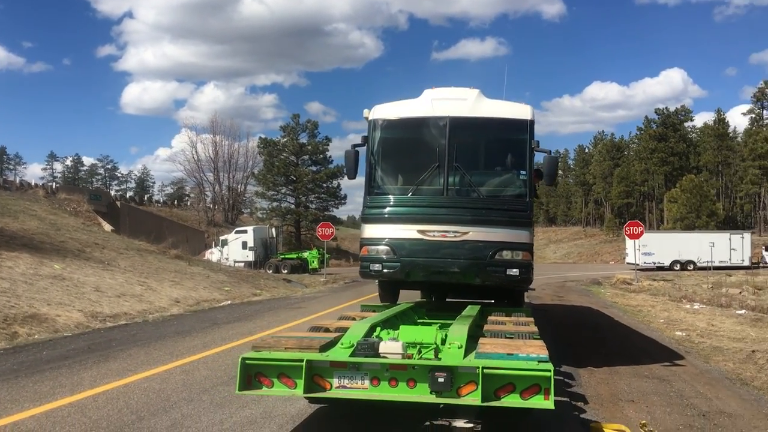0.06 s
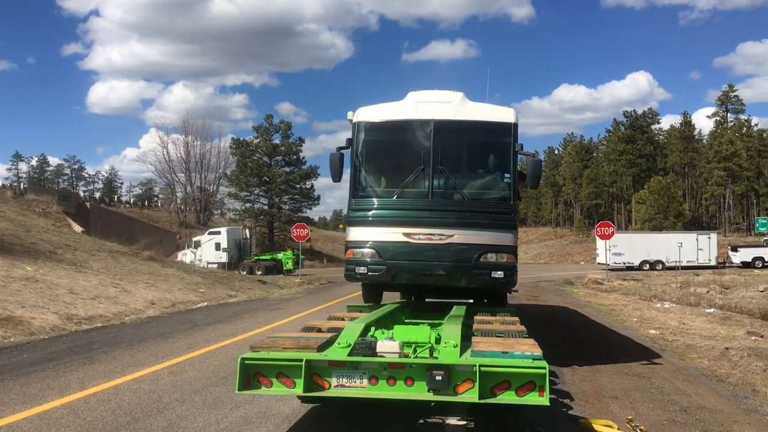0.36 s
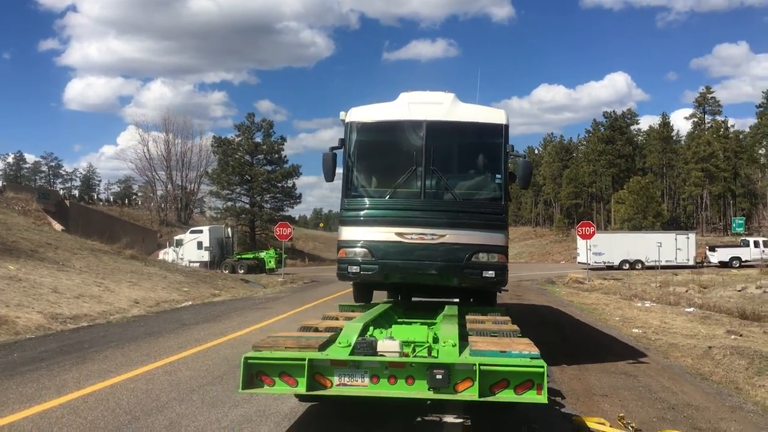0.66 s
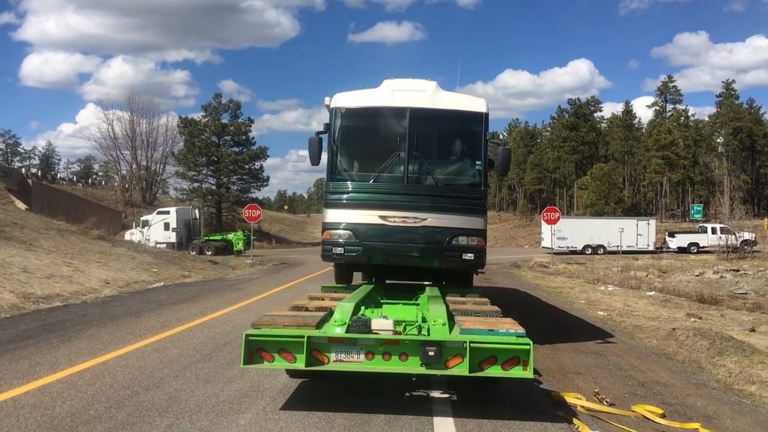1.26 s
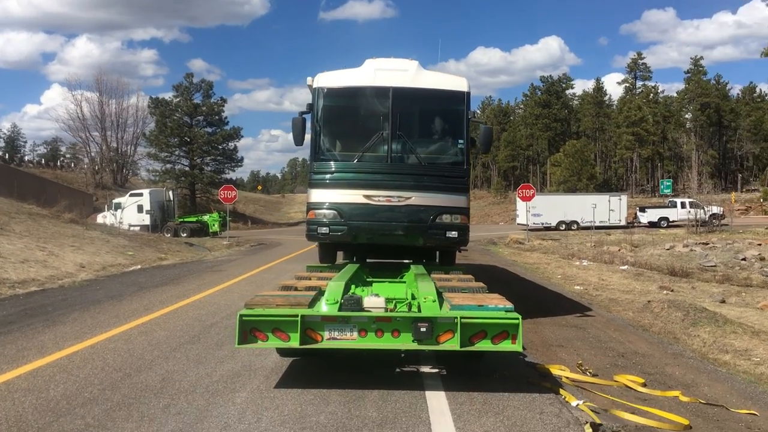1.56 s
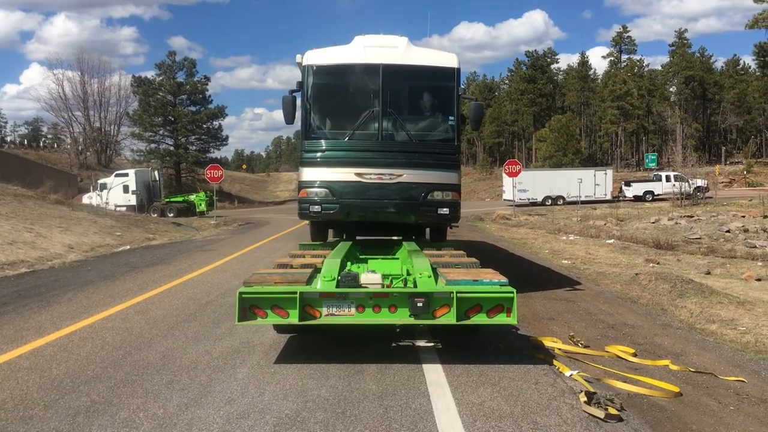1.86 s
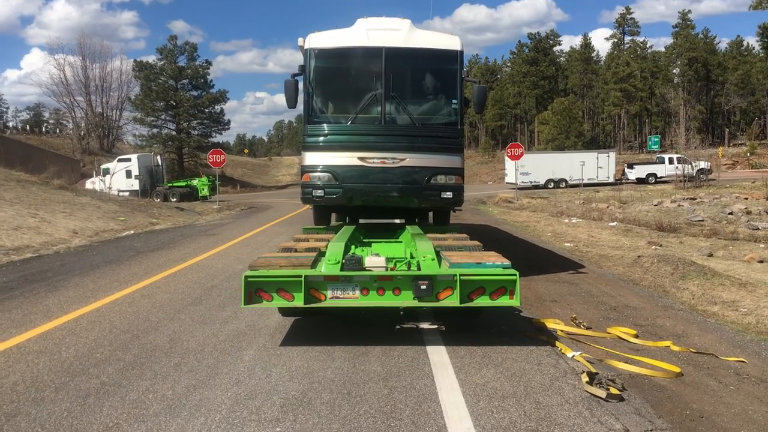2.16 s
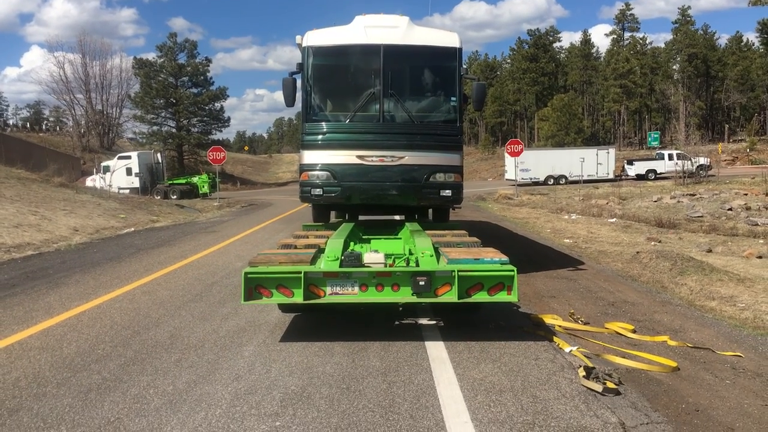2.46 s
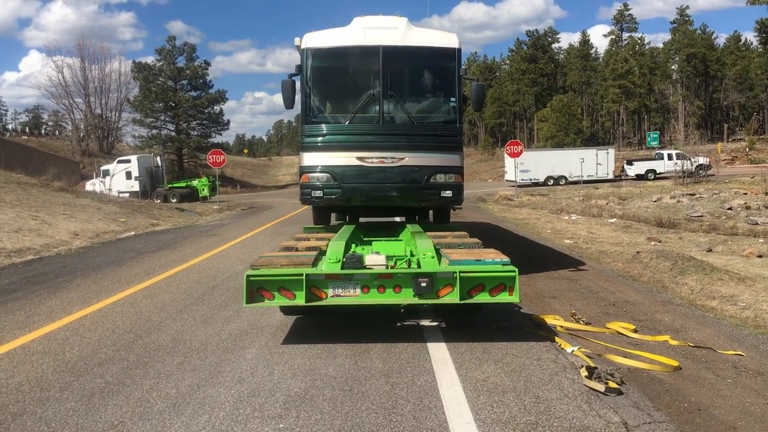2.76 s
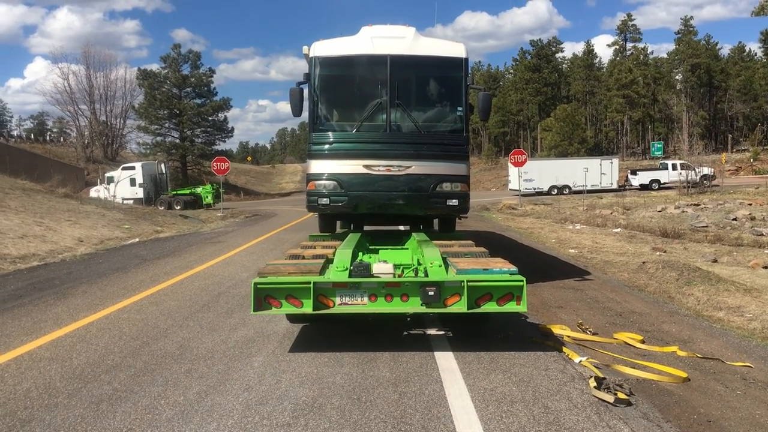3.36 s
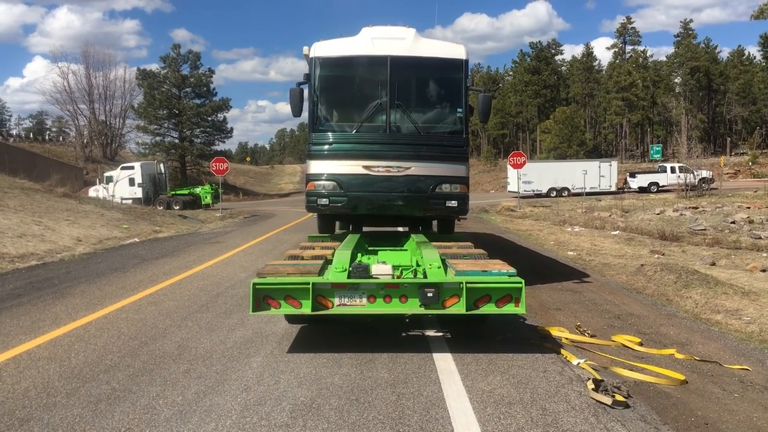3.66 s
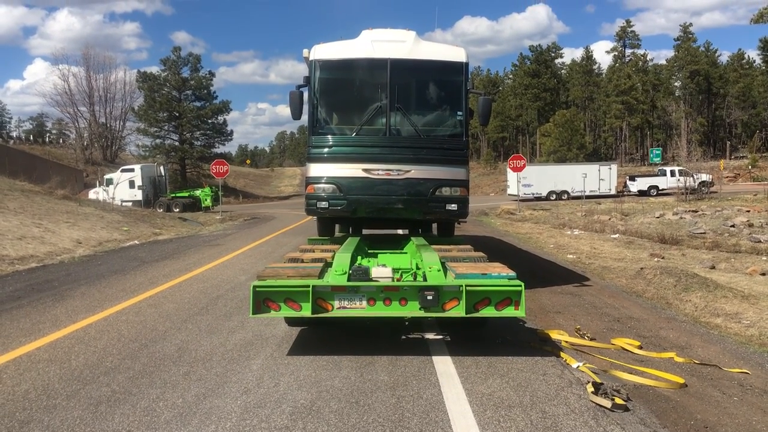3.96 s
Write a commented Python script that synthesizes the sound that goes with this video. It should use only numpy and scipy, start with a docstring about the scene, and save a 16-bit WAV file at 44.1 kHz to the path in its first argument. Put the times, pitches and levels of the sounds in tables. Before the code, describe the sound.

A diesel truck pulls slowly away, changing gear twice, with one air brake hiss.

```python
"""A diesel exhaust booms, sags and picks up again: a six-cylinder truck with a loaded low trailer
pulls slowly away along a roadside, changing gear twice. Its firings drive the boom and knock the
block into a clatter, the turbo sings faintly and the trailer deck thumps. About a second in, an
air brake valve vents once with a whistling hiss. Behind it lie road noise and a slowly sinking drone."""
import sys
import numpy as np
from scipy import signal
from scipy.fft import rfft, irfft
from scipy.io import wavfile
from scipy.ndimage import uniform_filter1d

SR = 44100
rng = np.random.default_rng(int(sys.argv[2]) if len(sys.argv) > 2 else 0)


def digitize_waveform(pressure):
    """Quantize a signal to 16-bit integers and store it at the path in sys.argv[1].

    Rows of a 2-D input are taken as channels; values are limited to [-1, 1].
    """
    field = np.atleast_2d(pressure).T
    bounded = np.clip(field, -1, 1)
    quanta = np.round(bounded * 32767).astype(np.int16)
    wavfile.write(sys.argv[1], SR, quanta)


N = 176400

# Tone colour of the road rumble: frequency_hz, relative_db
ROAD_SPECTRUM = [(20, -1), (45, 11), (90, 19), (130, 11), (175, 10), (260, -2.5), (480, -6), (700, -1.5),
                 (1050, -5.5), (1500, -6), (2100, -12), (3300, -13.5), (5000, -30.5), (9000, -53.5),
                 (16000, -53)]
# Roar of tyres on asphalt: time_s, level_db, centre_hz
TYRE_ROAR = [(0, -54.5, 950), (.35, -49.5, 980), (.8, -49, 1130), (1.3, -53.5, 1100), (2.1, -52, 1000),
             (2.7, -58.5, 850), (3.1, -54, 850), (4, -56, 900)]
# The sinking pair of tones: time_s, upper_pitch_hz, upper_level_db, lower_level_db
DRONE_GLIDE = [(0, 225.5, -56, -47), (.45, 221.6, -52, -41.5), (.72, 221.2, -44, -41),
               (1.0, 218, -51, -36.5), (1.35, 213, -48, -38.5), (1.7, 206.4, -52, -54.5),
               (2.4, 197.6, -51, -38.5), (3, 190, -55, -42.5), (4, 186, -51.5, -48)]
# Trailer thumps: start_s, level_db, pitch_hz, rattle_db
DECK_THUMPS = [(.43, -27.5, 86, -52), (.86, -27.5, 81.2, -54), (2.56, -27.5, 73.1, -40.5),
               (2.615, -27, 62, -50), (2.866, -26.5, 92.8, -48), (3.195, -19.5, 76, -49),
               (3.47, -20.5, 67.2, -51)]
# Ringing modes of the deck: pitch_ratio, relative_db
DECK_MODES = [(1, 2), (1.45, -10), (2.3, -12)]
# Tone colour of the air brake jet: frequency_hz, relative_db
JET_SPECTRUM = [(880, -44), (1500, -10), (1930, -6), (2110, -14), (2330, -3.5), (2720, -8), (3090, -1.5),
                (3610, -5), (3910, -8), (4660, -8.5), (5450, -12), (5890, -10.5), (7520, -21.5),
                (9140, -19.5), (10100, -27), (11700, -23.5), (15500, -31)]
# Whistles of the valve port: centre_hz, width_hz, level_db
PORT_WHISTLES = [(2420, 160, -49.5), (2975, 68, -49.5), (3177, 55, -43), (3490, 53, -52.5)]
# Engine revs, dipping at each gear change: time_s, firing_hz
FIRING_RATE = [(0, 56), (.15, 47.5), (.5, 39), (.8, 37), (1.0, 46), (1.25, 57), (1.5, 61.5), (1.85, 64.5),
               (2.15, 67), (2.3, 64.5), (2.45, 48), (2.72, 43), (2.9, 47.5), (3.2, 53), (3.5, 60.5),
               (3.75, 64.7), (4, 66.5)]
# Tone colour of the intake hiss: frequency_hz, relative_db
INTAKE_SPECTRUM = [(2000, -28.5), (4000, -8), (4600, 4.5), (5800, -3.5), (7000, -15), (9000, -18),
                   (11000, -24.5), (16000, -33.5)]
# Turbo whistle: time_s, pitch_hz, level_db
TURBO_WHISTLE = [(0, 4480, -77), (.35, 4600, -69), (.68, 4700, -66.5), (.88, 5170, -62), (1.4, 5144, -66.5),
                 (2.15, 5200, -66.5), (2.45, 5050, -74.5), (2.62, 4780, -65.5), (3.0, 4900, -68),
                 (3.33, 5160, -67.5), (4, 5240, -66)]
# Swell of the low-mid growl: time_s, level_db
GROWL_LEVEL = [(0, -64.5), (.8, -53), (1.2, -53.5), (1.6, -50), (1.8, -50), (2.27, -47), (2.45, -52.5),
               (2.85, -50), (3.05, -62), (4, -67)]
# Block and panel resonances: centre_hz, width_hz, mid_scene_level_db, drift_db_per_s
BLOCK_MODES = [(678, 130, -61.5, 0), (855, 80, -53, 0), (1430, 370, -56, 1.5), (1767, 150, -56.5, 2),
               (2367, 216, -51, -0.06), (2965, 350, -59, -1), (3253, 150, -59, 0.9), (4610, 370, -68, 2.5)]
# Tone colour of the engine's mechanical rush: frequency_hz, relative_db
RUSH_SPECTRUM = [(300, -8.5), (500, -8.5), (900, -1), (1500, -1.5), (2050, -5), (3350, -6), (3850, -15),
                 (5500, -18.5), (7000, -28), (9000, -36), (11000, -52.5), (16000, -45)]
# Engine effort, riding the whole clatter: time_s, gain_db
CLATTER_GAIN = [(0, -4.5), (.65, -3), (.9, 0.5), (1.35, 3), (1.8, 1.5), (2.18, 1.5), (2.35, -2), (2.6, 0.5),
                (3.05, -1.5), (3.6, -1), (4, -1)]
# Exhaust boom, swelling under load: time_s, level_db
BOOM_LEVEL = [(0, -23.5), (.2, -30), (.32, -38), (.8, -41), (.95, -29.5), (1.08, -22.5), (1.25, -19.5),
              (2.1, -19), (2.28, -22.5), (2.37, -32.5), (2.68, -33), (2.79, -38), (2.89, -23.5),
              (3.15, -25), (3.28, -25.5), (3.4, -19), (3.7, -19.5), (4, -19.5)]
# Exhaust overtones: firing_rate_multiple, relative_db
BOOM_OVERTONES = [(2, -20.5), (3, -36), (4, -40), (5, -44), (6, -45)]
# Shake from unequal cylinders: cycle_rate_multiple (six firings a cycle), level_db at LOPE_REST_HZ
LOPE_PARTIALS = [(3, -49.5), (4, -48), (5, -41.5), (7, -47), (8, -46.5), (9, -45.5), (10, -45.5),
                 (11, -49.5), (12, -48), (13, -48), (14, -50.5), (15, -56.5), (17, -58.5)]

CYLINDERS = 6
LOPE_REST_HZ, LOPE_LUG_DB_PER_HZ = 54, .0945  # the engine shakes more when it runs slowly
KNOCK_DECAY_PERIODS, KNOCK_FLOOR, KNOCK_SCATTER_DB = .5, .61, 2.5
VENT_OPEN_S, VENT_RISE_S, VENT_HOLD_S, VENT_CLOSING_S, VENT_SHUT_S = .9135, .11, .034, .12, 1.36
HISS_FALL_DB_PER_S, TREBLE_FALL_DB_PER_S, PORT_FALL_DB_PER_S = 67, 110, 45.5


def undb(db):
    """Decibels to gain."""
    return 10 ** (np.asarray(db) / 20)


def unit(x):
    """Scale to rms 1."""
    return x / np.sqrt(np.mean(x ** 2))


def curve(table, column=1):
    """One column of a table, joined by straight lines in time."""
    rows = np.array(table, float)
    return np.interp(np.arange(N) / SR, rows[:, 0], rows[:, column])


def walk(rate_hz):
    """A smooth random waver; rms 1."""
    hold = int(SR / rate_hz)
    steps = np.repeat(rng.standard_normal(N // hold + 1), hold)
    return unit(uniform_filter1d(uniform_filter1d(steps, hold), hold)[:N])


def noise():
    """White noise."""
    return rng.standard_normal(N)


def bins():
    """Frequencies of the spectrum, from 1 Hz up."""
    return np.maximum(np.arange(N // 2 + 1) * SR / N, 1)


def colour(x, points):
    """Equalise through (frequency_hz, relative_db) points; rms 1."""
    hz, db = np.array(points, float).T
    gain = undb(np.interp(np.log(bins()), np.log(hz), db))
    return unit(irfft(rfft(x) * gain, N))


def ring(x, hz, width_hz):
    """A steep resonance; rms 1."""
    f = bins()
    return unit(irfft(rfft(x) / (1 + .5j * (f / hz - hz / f) * hz / width_hz) ** 2, N))


def tone(hz):
    """A sine that follows a pitch curve; rms 1."""
    return np.sqrt(2) * np.sin(2 * np.pi * (np.cumsum(hz) / SR + rng.random()))


def band(hz, width_hz):
    """Narrow noise around a moving centre; rms 1."""
    lowpass = signal.butter(2, width_hz / 2, fs=SR, output="sos")
    smear = signal.sosfilt(lowpass, noise() + 1j * noise())
    return unit((smear * np.exp(2j * np.pi * np.cumsum(hz) / SR)).real)


def road(rumble_db=-38.5):
    """A bed of low outdoor rumble under two bands of tyre roar on asphalt."""
    rumble = colour(noise(), ROAD_SPECTRUM) * undb(rumble_db + .59 * walk(8.7))
    centre_hz = curve(TYRE_ROAR, column=2)
    roar = band(centre_hz, width_hz=360) + undb(-6.5) * band(.62 * centre_hz, width_hz=160)
    return rumble + roar * undb(curve(TYRE_ROAR) + walk(12))


def drone(jitter=.012, breath=.6, lower_ratio=.632):
    """Two wavering low tones sink together, the upper one rough with breath."""
    hz = curve(DRONE_GLIDE) * (1 + jitter * walk(22))
    upper = (tone(hz) + breath * band(hz, width_hz=22)) / np.hypot(1, breath)
    upper *= undb(curve(DRONE_GLIDE, column=2) + 2 * walk(12.94))
    lower = tone(hz * lower_ratio) * undb(curve(DRONE_GLIDE, column=3) + 2.5 * walk(13))
    return upper + lower


def air_leak(start_s=.3, length_s=.2, level_db=-81):
    """A very faint, high puff of air ahead of the brake vent."""
    progress = np.clip((np.arange(N) / SR - start_s) / length_s, 0, 1)
    return np.sin(np.pi * progress) * undb(level_db) * ring(noise(), hz=7600, width_hz=2000)


def trailer(rise_s=.0091, decay_s=.04):
    """The loaded deck rings in short, dull thumps, each with a little rattle."""
    t, thumps = np.arange(N) / SR, np.zeros(N)
    for start_s, level_db, pitch_hz, rattle_db in DECK_THUMPS:
        age = np.maximum(t - start_s, 0)
        envelope = np.minimum(age / rise_s, 1) * np.exp(-np.maximum(age - rise_s, 0) / decay_s)
        phase = 2 * np.pi * pitch_hz * age
        deck = sum(undb(level_db + db) * np.sin(ratio * phase) for ratio, db in DECK_MODES)
        rattle = undb(rattle_db) * ring(noise(), hz=290, width_hz=150)
        thumps += envelope * (deck + rattle)
    return thumps


def air_brake(jet_db=-35.5, split_hz=6000, port_rise_s=.065, echo_db=-16, echo_spread_s=.012):
    """The valve opens; its jet hisses, whistles in the port and dulls as the pressure falls."""
    t = np.arange(N) / SR
    age = t - VENT_OPEN_S
    fading_s = np.maximum(age - VENT_RISE_S - VENT_HOLD_S, 0)
    low_cut = signal.butter(2, 1500, "high", fs=SR, output="sos")
    jet = undb(jet_db) * unit(signal.sosfilt(low_cut, colour(noise(), JET_SPECTRUM)))
    body = irfft(rfft(jet) / (1 + (bins() / split_hz) ** 4), N)
    treble = jet - body
    hiss = body * undb(-HISS_FALL_DB_PER_S * fading_s) + treble * undb(-TREBLE_FALL_DB_PER_S * fading_s)
    whistle = sum(undb(db) * ring(noise(), hz, width_hz) for hz, width_hz, db in PORT_WHISTLES)
    whistle *= undb(-PORT_FALL_DB_PER_S * fading_s)
    air = hiss * np.clip(age / VENT_RISE_S, 0, 1) + whistle * np.clip(age / port_rise_s, 0, 1)
    air *= np.clip((VENT_SHUT_S - t) / VENT_CLOSING_S, 0, 1)
    # four quick reflections off chassis and road
    echoes = sum(np.roll(air, int(lag * echo_spread_s * SR)) for lag in rng.random(size=4))
    return air + undb(echo_db) * echoes


def intake(firing_hz, full_revs_hz=66, full_revs_db=-70.5, db_per_hz=1):
    """Air drawn into the engine hisses louder as the revs climb."""
    level_db = full_revs_db + db_per_hz * (firing_hz - full_revs_hz)
    return colour(noise(), INTAKE_SPECTRUM) * undb(level_db + walk(10))


def turbo():
    """A breathy whistle that climbs as boost builds."""
    whistle = band(curve(TURBO_WHISTLE), width_hz=270)
    return whistle * undb(curve(TURBO_WHISTLE, column=2) + 2 * walk(11))


def growl(firing_hz):
    """A hollow low-mid resonance, pulsing with the firings."""
    pulsing = 1 + .57 * tone(firing_hz)
    return ring(pulsing * noise(), hz=352, width_hz=80) * undb(curve(GROWL_LEVEL))


def clatter(firing_hz, rush_db=-51.5):
    """Each firing sends a burst of knock into the block; every cylinder has its own strength."""
    firings = np.cumsum(firing_hz) / SR
    index = firings.astype(int)
    per_cylinder = rng.standard_normal(CYLINDERS)[index % CYLINDERS]
    per_firing = noise()[index]
    strength = undb(KNOCK_SCATTER_DB * (per_cylinder + per_firing) / np.sqrt(2))
    knock = KNOCK_FLOOR + strength * np.exp(-(firings % 1) / KNOCK_DECAY_PERIODS)
    from_middle_s = (np.arange(N) - N / 2) / SR
    block = np.zeros(N)
    for hz, width_hz, db, drift in BLOCK_MODES:
        gain = undb(db + drift * from_middle_s + 1.2 * walk(14))  # colour shifts as the truck moves off
        block += gain * ring(knock * noise(), hz, width_hz)
    rush = undb(rush_db) * colour((knock + .36) * noise(), RUSH_SPECTRUM)
    return (block + rush) * undb(curve(CLATTER_GAIN))


def exhaust(firing_hz):
    """The firing note booms with weak overtones; unequal cylinders add a fluttering lope around it."""
    boom = tone(firing_hz)
    for multiple, db in BOOM_OVERTONES:
        boom += undb(db + 2.5 * walk(14)) * tone(multiple * firing_hz)
    cycle_hz = firing_hz / CYLINDERS
    lope = sum(undb(db + 3 * walk(7.06)) * tone(multiple * cycle_hz) for multiple, db in LOPE_PARTIALS)
    boom *= undb(curve(BOOM_LEVEL) + .3 * walk(23))
    lope *= undb(LOPE_LUG_DB_PER_HZ * (LOPE_REST_HZ - firing_hz))
    return boom + lope


def scene():
    """Truck and roadside in mono; one slightly unsteady rev curve ties the engine together."""
    firing_hz = curve(FIRING_RATE) * (1 + .006 * walk(15))
    engine = exhaust(firing_hz) + clatter(firing_hz) + growl(firing_hz) + intake(firing_hz) + turbo()
    return (engine + air_brake() + air_leak() + trailer() + drone() + road())[None]


def record(dry):
    """The microphone drops the deepest bass and cuts the top."""
    bass_cut_hz, top_cut_hz = 36.5, 15700
    thinned = signal.sosfilt(signal.butter(4, bass_cut_hz, "high", fs=SR, output="sos"), dry)
    return signal.sosfilt(signal.ellip(10, .1, 80, top_cut_hz, fs=SR, output="sos"), thinned)


dry = scene()
out = record(dry)
digitize_waveform(out)
```